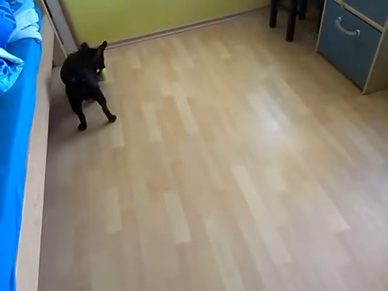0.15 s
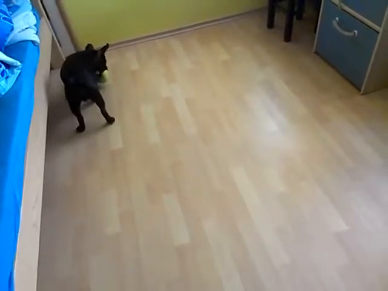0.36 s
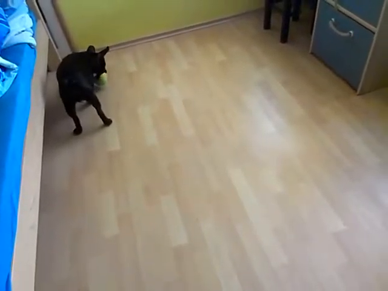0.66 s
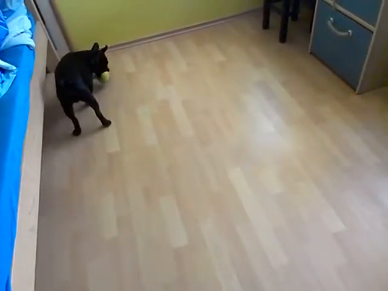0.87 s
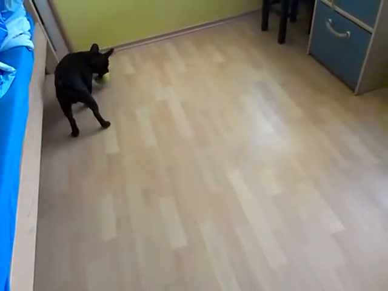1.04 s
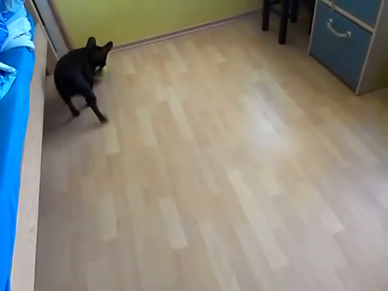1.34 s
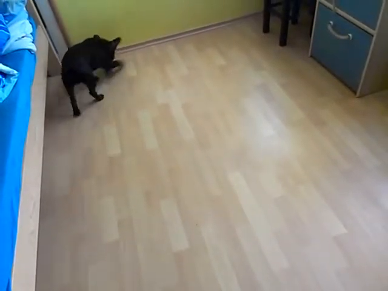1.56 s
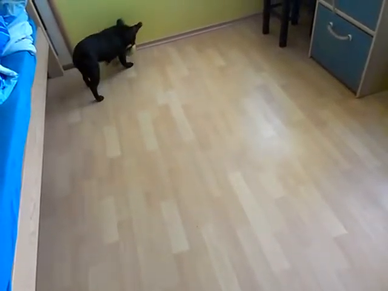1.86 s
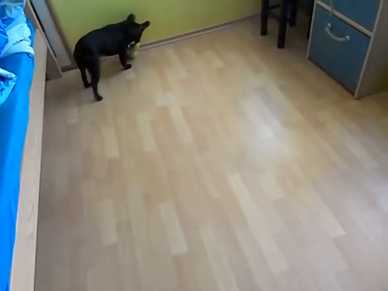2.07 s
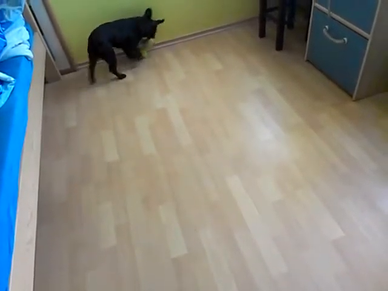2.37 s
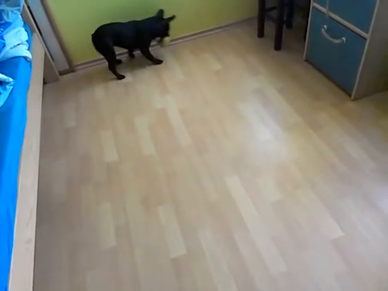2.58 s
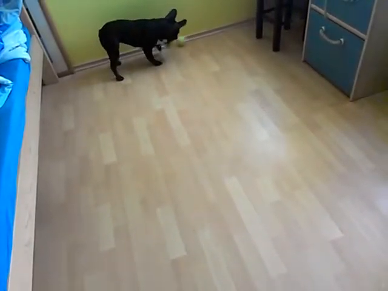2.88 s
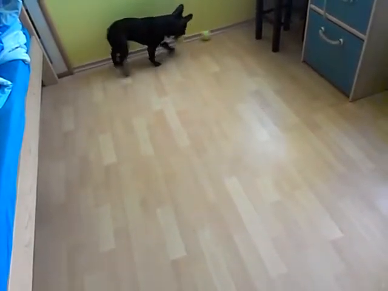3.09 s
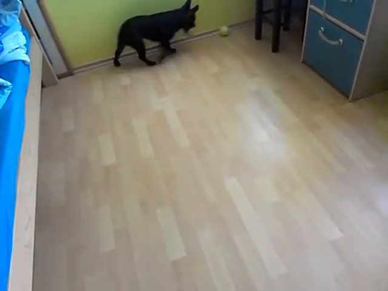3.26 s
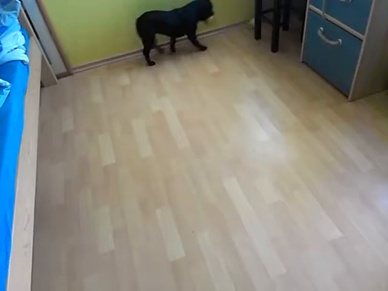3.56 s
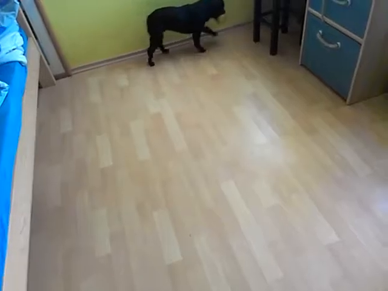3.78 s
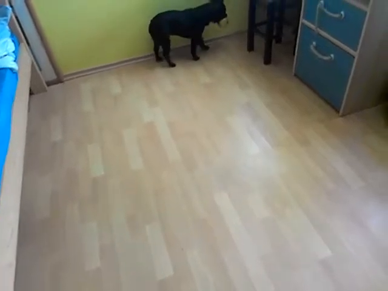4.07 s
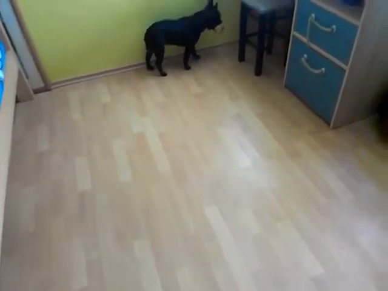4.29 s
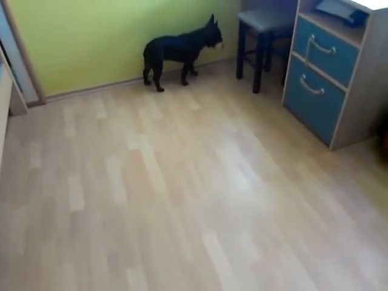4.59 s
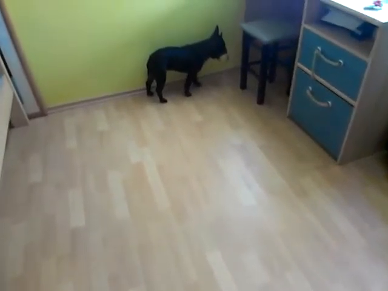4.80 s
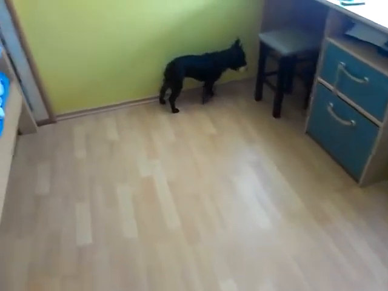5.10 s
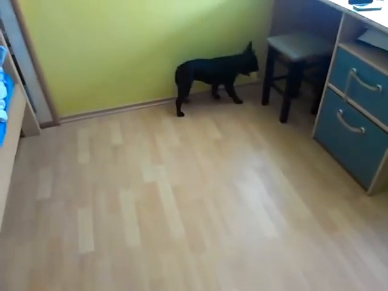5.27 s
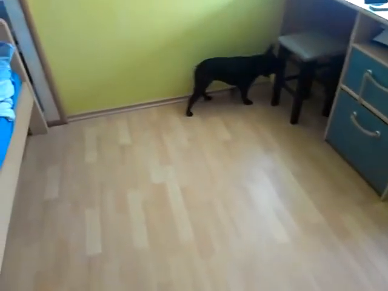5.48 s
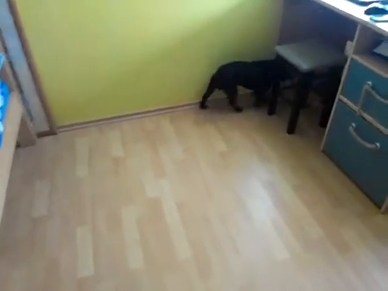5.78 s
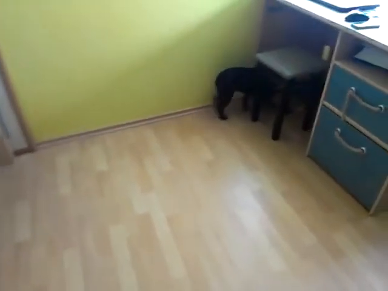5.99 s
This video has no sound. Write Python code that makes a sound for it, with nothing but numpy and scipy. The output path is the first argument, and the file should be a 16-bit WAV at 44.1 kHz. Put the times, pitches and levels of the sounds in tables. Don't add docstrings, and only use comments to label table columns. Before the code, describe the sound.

In a bare, echoing bedroom, a small dog snuffles some distance from a small, bright microphone with faint hiss. It opens on a thin airy sniff already under way, with two soft sniffs and a claw tick near 0.5 seconds, then near quiet. From 1.15 to 1.85 the dog is busy: short hissing snorts, sharp claw clicks, the strongest near 1.6, and low padded thuds on the boards. A firmer thump lands at 2.0, then snorts build to a loud spitting burst at about 2.45, with crisp ticks near 2.7. After a lull, clicks return at 3.3 and another strong snort at 3.5, followed by softer breaths until 3.9. Dull thuds around 4.2 and 4.5 and a paired claw tick at 4.8 punctuate a quieter spell. From 5.2 short puffs resume, finishing with a flurry of ticks and snuffles from 5.6 to 6.1, over faint floor rumble.

```python
import sys
import numpy as np
from scipy import signal
from scipy.fft import rfft, irfft
from scipy.io import wavfile
from scipy.ndimage import uniform_filter1d, minimum_filter1d

SR = 44100
rng = np.random.default_rng(int(sys.argv[2]) if len(sys.argv) > 2 else 0)


def to_wav(sig):
    pcm = np.clip(np.atleast_2d(sig), -1, 1) * 32767
    pcm = np.round(pcm).astype(np.int16)
    wavfile.write(sys.argv[1], SR, pcm.T)


def voltage_ratio(level):
    return 10 ** (np.asarray(level, float) / 20)


N = 271038

# frequency in Hz, level per hertz in dB.
HISS = [(12, -22.5), (20, 0), (77, -10), (387, -10.5), (1160, -15), (2710, -16.5), (8610, -21),
        (17000, -21.5)]
HISS_DB = -68
# frequency in Hz, level per hertz in dB.
JOISTS = [(30, -14), (70, 0), (130, -1.5), (250, -2.5), (450, -5), (900, -18)]
# time in seconds, level in dB.
WEIGHT_SHIFTS = [
    (0.0, -50),
    (1.2, -48),
    (2.5, -36),
    (3.2, -49.5),
    (3.9, -40.5),
    (5.3, -33),
    (5.7, -40),
    (5.9, -44),
]
# frequency in Hz, time to fall by 60 dB in seconds.
ECHO_TIMES = [(200, 0.47), (700, 0.54), (1800, 0.42), (4600, 0.48), (8000, 0.27), (14000, 0.47)]
# time in seconds, peak in dB, hardness in dB, upper ring in dB,
# lowest ring in Hz.
THUDS = [(1.409, -41.5, -8, -5.5, 197), (1.448, -50, -5, -13, 200), (1.567, -54, 6, 0, 200),
         (1.687, -49, -4.5, -19, 174), (2.026, -40, 4, -15, 284), (2.034, -43, -4, -4, 283),
         (2.588, -52.5, -3.5, -8, 195), (3.116, -54, -9, -21, 195), (3.679, -50, -12, -21, 203),
         (4.183, -41.5, -12.5, -8.5, 181.2), (4.266, -76, -5, -7, 195), (4.467, -44, -9.5, -6, 205),
         (4.493, -63, 2, -4, 232), (4.771, -60, 4, -16, 195), (5.949, -55, -10, 4, 195)]
# frequency in Hz, level in dB, time to fall by 60 dB in seconds.
BOARD_RINGS = [(195, -2.5, 0.041), (267, -9, 0.053), (541, -3.5, 0.058), (740, -33, 0.02),
               (1130, -8, 0.019)]
# frequency in Hz, level per hertz in dB.
PAD_SLAP = [(100, -26.5), (300, -7.5), (600, -1), (1200, -7), (1900, -12), (3000, -18.5), (5000, -18),
            (15000, -60)]
# time in seconds, peak in dB, dull push in dB, crispness in dB.
TICKS = [(0.4284, -37, -16, -27), (1.1672, -25.5, -21.5, -20), (1.2738, -37.5, -23, -18),
         (1.3133, -20, -36, -28), (1.4905, -33, -30, -34), (1.5684, -13.5, -33, -9.5),
         (1.6747, -19.5, -25, -44), (1.8085, -29, -16, -27), (2.0243, -37.5, 10, -30),
         (2.134, -24.5, -32, -39), (2.39, -25, -20, -34), (2.6544, -36, -11, -21),
         (2.6981, -27, -12.5, -5.5), (2.7415, -19, -17, -10.5), (3.1214, -36, -15, -25),
         (3.2864, -41, -9, -18), (3.2921, -32.5, -23, -29), (3.3085, -26.5, -16.5, -37),
         (3.4191, -25.5, -14, -30), (3.8571, -41, -13, -32), (3.8847, -25.5, -12.5, -40),
         (4.4632, -42.5, -26, -10), (5.1568, -31, -15.5, -24), (5.5119, -35, -15, -16),
         (5.6299, -27.5, -12.5, -32), (5.8232, -22.5, -21, -30), (5.9357, -30, -14.5, -35),
         (5.957, -38, -12, -40), (6.0525, -32.5, -18, -27), (6.0824, -29, -15, -13)]
# time in seconds, peak in dB, dull push in
# dB, crispness in dB.
MORE_TICKS = [
    (1.486, -26, -15, -29),
    (4.77, -41, 4, -21),
    (4.773, -28, -20, -9.5),
    (5.795, -38, -12, -16),
]
# frequency in Hz, level per hertz in dB.
CLAW_CLICK = [(200, -69), (700, -21.5), (2500, -8), (4500, -4), (6300, 1), (8000, -2), (11000, -20.5),
              (16000, -42.5)]
# frequency in Hz, level per hertz in dB.
CLAW_PUSH = [(100, -41), (300, -12.5), (800, 1), (1200, -2), (1900, -1.5), (3000, -4), (5000, -10),
             (15000, -56.5)]
# frequency in Hz, width
# in Hz, level in dB.
JET_PEAKS = [(6040, 1040, -4.5), (6815, 1900, -2), (5793, 3240, -4), (8150, 430, -18)]
# frequency in Hz, level per hertz in dB.
BREATH_BODY = [(250, -46), (500, -14), (800, -6.5), (1500, -3), (2500, 0), (4000, 9), (6000, -12.5)]
# frequency in Hz, level per hertz in dB.
SIZZLE = [(7000, -5.5), (9500, 2.5), (12000, -7), (15000, -8), (17000, -55)]
# peak time in seconds, effort in dB, rise in seconds, fall in seconds,
# open mouth in dB.
SNORTS = [(1.17, -38, 0.017, 0.016, -14), (1.311, -27.5, 0.02, 0.053, -17),
          (1.415, -38.5, 0.11, .015, -12.5), (1.5, -25.5, 0.024, 0.014, -20),
          (1.569, -40.5, 0.0026, 0.017, 1), (1.611, -28.5, 0.052, 0.05, -13),
          (1.674, -29, 0.0056, 0.055, -17), (1.81, -34, .005, 0.025, -12), (2.12, -44, 0.073, 0.033, -23),
          (2.137, -35.5, 0.0092, 0.062, -14.5), (2.303, -44, 0.052, .015, -18),
          (2.386, -44, 0.064, 0.033, -11.5), (2.43, -36, 0.0067, 0.019, -18),
          (2.457, -21.5, 0.037, 0.036, -10.5), (2.742, -37, 0.086, 0.035, -9),
          (3.312, -35, .006, 0.026, -14.5), (3.423, -32.5, 0.013, 0.088, -21),
          (3.484, -21.5, 0.07, 0.057, -11.5), (3.903, -33, 0.013, 0.13, -10.5),
          (3.955, -45.5, .08, 0.015, -26), (5.239, -31.5, 0.026, 0.015, -8), (5.64, -29, 0.031, 0.032, -10),
          (5.826, -38.5, 0.04, 0.051, -20.5), (5.982, -45, 0.01, 0.025, -21)]
# peak time in seconds, effort in dB, rise in seconds, fall in seconds.
BREATHS = [(1.235, -56, .04, 0.016), (1.276, -44.5, 0.0099, 0.031), (1.857, -51, 0.016, 0.018),
           (1.99, -55, .08, 0.052), (2.25, -51, 0.034, .1), (2.93, -63.5, 0.026, 0.24),
           (3.12, -63, 0.0076, 0.14), (3.234, -60, .03, 0.068), (3.6, -45.5, .02, 0.089),
           (3.641, -43, 0.019, 0.034), (3.796, -58.5, 0.016, 0.055), (3.857, -55, .004, 0.16),
           (4.22, -67, 0.024, 0.15), (4.364, -59, 0.048, 0.034), (4.455, -60, 0.059, .02),
           (5.12, -70, 0.26, 0.054), (5.162, -49, 0.031, 0.042), (5.3, -62, 0.033, 0.24),
           (5.41, -56.5, 0.41, 0.06), (5.514, -40.5, 0.0082, 0.018), (5.6, -59, 0.0085, .03),
           (5.803, -39.5, .005, 0.028), (5.959, -35.5, 0.0096, 0.031), (6.096, -54, .14, 0.11)]
# peak time in seconds, effort in dB, rise in seconds,
# fall in seconds.
SNIFFS = [
    (0.002, -39, 0.016, 0.073),
    (0.11, -49.5, 0.096, 0.029),
    (0.471, -42.5, 0.043, 0.073),
    (0.566, -42.5, 0.039, 0.071),
]
# frequency in Hz, depth in dB.
KEPT_DEPTH = [(100, 45), (300, 35), (500, 39), (1000, 50), (4000, 50), (9000, 45), (12500, 34), (17000, 32)]
# frequency in Hz, level in dB.
QUIETEST_KEPT = [(8000, -112), (11000, -106), (14500, -103), (15600, -100), (16500, -96)]
# frequency in Hz, depth in dB.
NEIGHBOUR_DEPTH = [(1500, 18), (3500, 11), (6500, 16), (8500, 8), (10000, 6), (13000, 6.5), (17000, 7)]

REST_DB, CLAW_SHAKE_DB, PAW_SHAKE_DB, SHIFT_SHAKE_DB, SHAKE_S = -93, -63.5, -36.5, -38.5, .12
TOCK_START_S, TOCK_EVERY_S, TOCK_DB = .376, .641, -63.5

BREATH_MOUTH_DB, SNIFF_MOUTH_DB, SNIFF_AIR_DB = -13, -24.5, 11
SWING_DB = 20
ROUND_RISE, ROUND_FALL = 1.27, 1.09
USUAL_DB, USUAL_MOUTH_DB = -45, -13
BODY_PER_DB, SIZZLE_DB, SIZZLE_PER_DB, SIZZLE_PER_MOUTH = -0.0678, -19, -0.62, 0.27
MOUTH_HZ, MOUTH_HZ_PER_DB, MOUTH_WIDTH_HZ = 2480, 6, 1630


def evened(x):
    return x / np.sqrt(np.mean(x ** 2) + 1e-20)


def read(points, hz):
    f, value = np.transpose(points)
    return np.interp(np.log(hz + 1), np.log(f + 1), value)


def add(mix, s, sound):
    part = mix[round(s * SR):][:len(sound)]
    part += sound[:len(part)]


def coloured(x, points):
    gain = voltage_ratio(read(points, np.fft.rfftfreq(len(x), 1 / SR)))
    return evened(irfft(rfft(x) * gain, len(x)))


def pulse(points, size=512):
    log_gain = read(points, abs(np.fft.fftfreq(size, 1 / SR))) * np.log(10) / 20
    click = np.fft.ifft(np.exp(np.conj(signal.hilbert(log_gain)))).real
    return click / abs(click).max()


def resonate(x, hz, width):
    return signal.lfilter(*signal.iirpeak(hz, hz / width, SR), x)


def sweep(x, hz, width):
    turn = np.exp(2j * np.pi * np.cumsum(hz) / SR)
    r = np.exp(-np.pi * width / SR)
    return 2 * (turn * signal.lfilter([1 - r], [1, -r], x / turn)).real


def hiss():
    lumps = evened(uniform_filter1d(rng.standard_normal(N), size=3000))
    return voltage_ratio(HISS_DB + 2.1 * lumps) * coloured(rng.standard_normal(N), HISS)


def tocks():
    out = np.zeros(N)
    bump = np.diff(signal.windows.hann(400) ** 2) * 100
    for s in np.arange(TOCK_START_S, N / SR, TOCK_EVERY_S):
        add(out, s, voltage_ratio(TOCK_DB) * bump)
    return out


def shudder(lumps_db=1.5):
    lumps = evened(uniform_filter1d(rng.standard_normal(N), size=1500))
    power = np.full(N, voltage_ratio(2 * REST_DB))
    fade = np.exp(-np.arange(SR) / SR / SHAKE_S)
    stirred_by = ((TICKS, CLAW_SHAKE_DB), (THUDS, PAW_SHAKE_DB), (WEIGHT_SHIFTS, SHIFT_SHAKE_DB))
    for rows, shake_db in stirred_by:
        for s, db, *_ in rows:
            add(power, s, voltage_ratio(db + shake_db + REST_DB) * fade * 100)
    rumble = coloured(rng.standard_normal(N), JOISTS)
    return np.sqrt(power) * voltage_ratio(lumps_db * lumps) * rumble


def room(x, uneven_db=5.0, mixing_s=0.052):
    taps = np.zeros(SR)
    at = np.arange(50, SR - 20, 20)
    size = voltage_ratio(uneven_db * np.exp(-at / SR / mixing_s) * rng.standard_normal(len(at)))
    taps[at + rng.integers(0, 20, len(at))] = size * rng.choice([-1., 1.], len(at))
    hz, t, z = signal.stft(taps, SR, nperseg=256)
    fade = voltage_ratio(-60 * t / read(ECHO_TIMES, hz)[:, None])
    tail = signal.istft(z * fade, SR, nperseg=256)[1]
    return signal.fftconvolve(x, tail / np.linalg.norm(tail))[:N]


def thuds(rise_s=.005, slap_s=.005):
    out, t = np.zeros(N), np.arange(6000) / SR
    slap_t = t[:600]
    for s, db, hard_db, upper_db, low_hz in THUDS:
        tuned = np.transpose(BOARD_RINGS)[0] * (1 + .02 * rng.standard_normal(len(BOARD_RINGS)))
        tuned[0] = low_hz
        ring = np.zeros(len(t))
        for (_, ring_db, t60), hz in zip(BOARD_RINGS, tuned):
            ring += voltage_ratio(ring_db + upper_db * (hz > 400) - 60 * t / t60) * np.sin(2 * np.pi * hz * t)
        add(out, s - rise_s, voltage_ratio(db - 1.0) * ring * (1 - np.exp(-t / rise_s)))
        rattle = rng.standard_normal(len(slap_t)) * np.exp(-slap_t / slap_s)
        add(out, s, voltage_ratio(db + hard_db - 14.0) * np.convolve(pulse(PAD_SLAP), rattle))
    return out


def ticks(ring_hz=6500, ring_width_hz=900, ring_db=1.0):
    out = np.zeros(N)
    click = pulse(CLAW_CLICK)
    click = click + voltage_ratio(ring_db) * resonate(click, ring_hz, ring_width_hz)
    click = click / abs(click).max()
    push, crisp = pulse(CLAW_PUSH), pulse(SIZZLE)
    for s, db, dull_db, crisp_db in list(TICKS) + list(MORE_TICKS):
        add(out, s, voltage_ratio(db) * (click + voltage_ratio(dull_db) * push + voltage_ratio(crisp_db) * crisp))
    return out


def nose_air(grit_per_s=1500, grit_db=2.5, flutter_db=2.4):
    spits = voltage_ratio(grit_db * np.minimum(rng.exponential(1, N), 4)) * (rng.random(N) < grit_per_s / SR)
    air = rng.standard_normal(N) + evened(spits * rng.choice([-1., 1.], N))
    flutter = evened(uniform_filter1d(rng.standard_normal(N), size=220))
    return air * voltage_ratio(flutter_db * flutter)


def snuffles():
    air = nose_air()
    jet = np.zeros(N)
    for hz, width, db in JET_PEAKS:
        once = resonate(air, hz, width * 1.09)
        jet += voltage_ratio(db) * resonate(once, hz, width * 1.09)
    jet = evened(jet)
    body, sizzle, out = coloured(air, BREATH_BODY), coloured(air, SIZZLE), np.zeros(N)
    rows = [(*row, 0) for row in SNORTS]
    rows += [(*row, BREATH_MOUTH_DB, 0) for row in BREATHS]
    rows += [(*row, SNIFF_MOUTH_DB, SNIFF_AIR_DB) for row in SNIFFS]
    for s, peak_db, rise, fall, mouth_db, air_db in rows:
        k = np.arange(max(round((s - 2 * rise) * SR), 0), min(round((s + 2 * fall) * SR), N))
        t = k / SR - s
        away = np.where(t < 0, abs(t / rise) ** ROUND_RISE, abs(t / fall) ** ROUND_FALL)
        effort_db = peak_db - SWING_DB * away
        over_db = effort_db - USUAL_DB
        mouth_hz = MOUTH_HZ + MOUTH_HZ_PER_DB * np.maximum(over_db, -SWING_DB)
        mouth = 0.64 * body[k] + 0.71 * sweep(body[k], mouth_hz, MOUTH_WIDTH_HZ)
        body_db = mouth_db + BODY_PER_DB * over_db
        sizzle_db = air_db + SIZZLE_DB + SIZZLE_PER_DB * over_db
        sizzle_db = sizzle_db + SIZZLE_PER_MOUTH * (mouth_db - USUAL_MOUTH_DB)
        breath = jet[k] + voltage_ratio(body_db) * mouth + voltage_ratio(sizzle_db) * sizzle[k]
        out[k] += voltage_ratio(effort_db) * breath
    return out


def scene():
    air, claws, paws = snuffles(), ticks(), thuds()
    direct = voltage_ratio(-3.5) * air + voltage_ratio(-3.5) * claws + voltage_ratio(6.0) * paws
    far = room(voltage_ratio(-4.5) * air + voltage_ratio(9.0) * claws + voltage_ratio(4.5) * paws)
    no_bass = signal.butter(3, 140, "high", fs=SR, output="sos")
    thin = signal.sosfilt(no_bass, direct + far)
    return (thin + shudder() + hiss() + tocks())[None]


def drop_faint_bands(x, luck_db=5.5):
    frames = dict(nperseg=2048, noverlap=1024, window="cosine")
    hz, _, z = signal.stft(x, SR, **frames)
    bands = z[:1024].reshape(128, 8, -1)
    level_db = 10 * np.log10((abs(bands) ** 2).mean(1) + 1e-20)
    centre = hz[4:1024:8]
    loudest_db = level_db.max(0)
    limit_db = np.maximum(loudest_db - read(KEPT_DEPTH, centre)[:, None],
                          read(QUIETEST_KEPT, centre)[:, None])
    neighbours_db = -minimum_filter1d(-level_db, size=5, axis=0)
    limit_db = np.maximum(limit_db, neighbours_db - read(NEIGHBOUR_DEPTH, centre)[:, None])
    luck = luck_db * evened(uniform_filter1d(rng.standard_normal(level_db.shape), size=2, axis=1))
    kept = np.repeat(level_db + luck > limit_db, 8, axis=0)
    kept = np.vstack([kept, kept[-1:]])
    return signal.istft(z * kept, SR, **frames)[1][:N]


def band_limit(x):
    return signal.sosfilt(signal.butter(12, 17100, fs=SR, output="sos"), x)


def record(dry):
    kept = drop_faint_bands(dry[0])
    return band_limit(kept[None])


dry = scene()
out = record(dry)
to_wav(out)
```